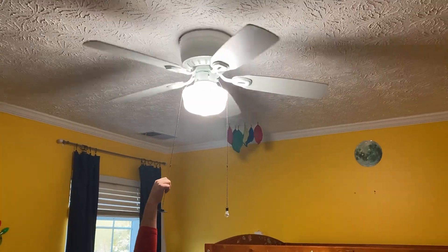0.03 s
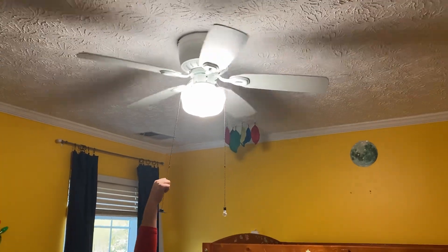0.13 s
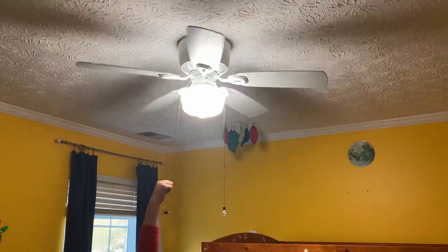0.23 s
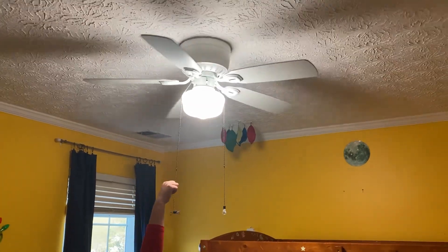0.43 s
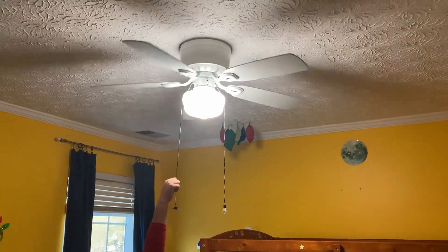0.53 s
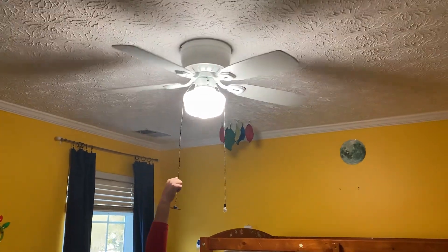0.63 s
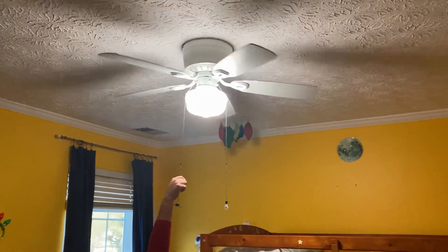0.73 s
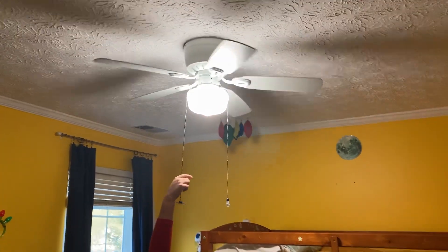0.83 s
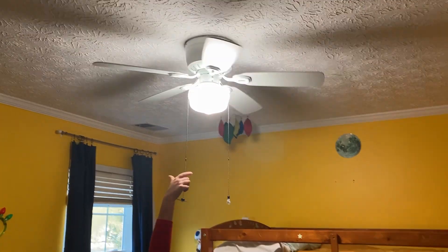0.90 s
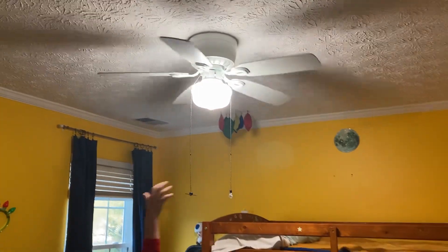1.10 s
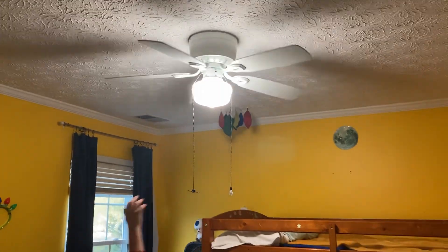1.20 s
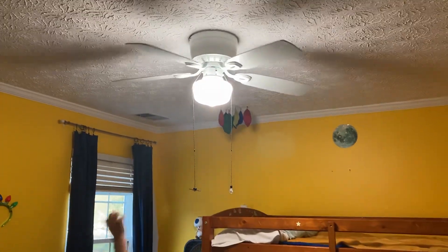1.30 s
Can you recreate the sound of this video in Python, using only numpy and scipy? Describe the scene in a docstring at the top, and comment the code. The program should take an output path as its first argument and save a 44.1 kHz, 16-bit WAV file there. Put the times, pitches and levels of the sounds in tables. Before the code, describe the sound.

A ceiling fan's pull-chain switch snaps with a brief bead rasp and low thud, then clacks back. A faint sleeve swish follows. The motor hums quietly in a small bedroom, with soft bumps on the hand-held microphone.

```python
"""The pull-chain switch of a running ceiling fan, worked by hand in a small bedroom.
Beads rasp through the eyelet and the switch snaps over: its impacts excite the modes of case, pawl and
housing, and the change of load makes the fan shudder on its mount. Let go, the switch clacks back and
the arm drops with a swish of sleeve friction. The motor hums faintly throughout, over a low rumble,
a faint breathy hiss near 2 kHz that swells and fades, and soft bumps of the hand-held microphone."""
import sys
import numpy as np
from scipy import signal
from scipy.fft import rfft, irfft
from scipy.io import wavfile

SR = 44100
rng = np.random.default_rng(int(sys.argv[2]) if len(sys.argv) > 2 else 0)


def store_pcm(level_fs):
    """Save levels as 16-bit WAV."""
    pcm = np.round(np.clip(level_fs, -1, 1) * 32767).astype(np.int16)
    wavfile.write(sys.argv[1], SR, np.atleast_2d(pcm).T)


N = 59535
T, FREQS = np.arange(N) / SR, np.fft.rfftfreq(N, 1 / SR)

# impacts inside the switch: t/s, case knock/dB, pawl tick/dB, housing ring/dB
CONTACTS = [(0.1032, -38, -42, -15.5), (.192, -43, -53.5, -28), (0.228, -18.5, -22, -3),
            (0.2474, -22, -43, -14), (0.2703, -13.5, -1, 2), (0.432, -38.5, -39, -46.5),
            (0.5002, -26.5, -30.5, -27), (0.5207, -16.5, -25, -27), (0.5234, -1, -2.5, -14.5)]
# left-right likeness of the stereo sound, in opposite phase near 9 kHz: f/Hz, likeness (clipped in use)
LIKENESS = [(60, .96), (130, 0.87), (290, 0.8), (640, 0.57), (1400, 0.046), (2400, 0.15), (4000, -0.063),
            (7500, 0.4), (9200, -1.5), (11300, 0.65), (15000, -0.6)]


def from_db(db):
    """Amplitude ratio: a factor of ten per 20 dB."""
    return 10 ** (np.asarray(db) / 20)


def at_hz(points, hz):
    """Interpolation on a logarithmic frequency axis."""
    f, value = np.transpose(points)
    return np.interp(np.log(hz + 1e-9), np.log(f), value)


def decay(t, t60):
    """Exponential damping: 60 dB in t60 seconds."""
    return np.exp(-np.log(1000) * t / t60)


def impulses(times, db):
    """Brief impacts idealised as single impulses."""
    train = np.zeros(N) + 1e-18
    np.add.at(train, (np.asarray(times) * SR).astype(int), from_db(db))
    return train


def convolve(x, response):
    """A linear system convolves its input with its impulse response."""
    return signal.fftconvolve(np.atleast_2d(x), np.atleast_2d(response), axes=1)[:, :N]


def delayed(x, seconds):
    """A circular delay: phase shift proportional to frequency."""
    return irfft(rfft(x) * np.exp(-2j * np.pi * FREQS * seconds), N)


def resonate(x, resonances):
    """Forced response of parallel two-pole resonators of alternating sign."""
    out = 0
    for k, (hz, width, db) in enumerate(resonances):
        radius = np.exp(-np.pi * width / SR)
        feedback = [1, -2 * radius * np.cos(2 * np.pi * hz / SR), radius ** 2]
        gain = (-1) ** k * from_db(db) * (1 - radius ** 2) / 2
        out += gain * signal.lfilter([1, 0, -1], feedback, x)
    return out


def ring(strikes, modes, longest_t60=.34):
    """Modal superposition: damped sines, out of step left and right where likeness is low."""
    response = 0
    for k, (hz, db, t60) in enumerate(modes):
        skew = np.arccos(np.clip(at_hz(LIKENESS, hz), -1, 1)) / 2 * np.array([[1], [-1]])
        envelope = from_db(db) * decay(T, min(t60, longest_t60))
        response += (-1) ** k * envelope * np.sin(2 * np.pi * hz * T + skew)
    return convolve(strikes, response)


def unit_rms(x):
    """Normalisation to unit mean power."""
    return x / np.sqrt(np.mean(x ** 2) + 1e-20)


def stereo_noise(spectrum):
    """Mid-side mixing: coloured noise, partly alike left and right, rms 1."""
    mid, side = rfft(rng.standard_normal((2, N)))
    alike = np.clip(at_hz(LIKENESS, FREQS), -.99, .99)
    pair = np.sqrt(1 + alike) * mid + np.sqrt(1 - alike) * side * np.array([[1], [-1]])
    return unit_rms(irfft(pair * from_db(at_hz(spectrum, FREQS)), N))


def fan_and_background(hum_hz=120, hum_db=-67, rumble_db=-65.5):
    """A pure tone over noise: motor hum, room rumble and a faint breathy hiss that swells and fades."""
    # spectra of the hiss (strongest near 2 kHz) and the rumble: f/Hz, relative density/dB
    hiss_spectrum = [(150, -18.5), (300, -3.5), (450, -4), (700, -10), (1200, -4.5), (1450, -2.5),
                     (1700, 4), (1880, -1.5), (2120, 5), (2500, -17), (3000, -30.5), (3700, -19.5),
                     (4300, -14), (5400, -34), (16000, -46.5)]
    rumble_spectrum = [(20, -12.5), (50, -7), (80, 1), (135, -10), (220, -14.5), (450, -18), (700, -21),
                       (1300, -31.5), (2100, -31.5), (3000, -40), (6000, -44), (12000, -43.5),
                       (16000, -56.5)]
    # envelope of the breathy hiss: t/s, level/dB
    hiss_level = [(0, -61.5), (.08, -74.5), (.2, -60.5), (.45, -68), (.72, -63), (.85, -64), (.96, -67.5),
                  (1.12, -65.5), (1.21, -73.5), (1.35, -91)]
    hiss = from_db(np.interp(T, *np.transpose(hiss_level))) * stereo_noise(hiss_spectrum)
    hum = from_db(hum_db) * np.sqrt(2) * np.sin(2 * np.pi * hum_hz * T)
    return hum + hiss + from_db(rumble_db) * stereo_noise(rumble_spectrum)


def handling(hz=53, rise_s=.0077):
    """Heavily damped oscillation: each bump of the microphone is two or three slow swings."""
    # soft low bumps: t/s, level/dB
    bumps = [(0.089, -56), (.575, -80), (0.791, -59.5), (1.035, -53), (1.095, -55), (1.274, -55),
             (1.326, -56.5)]
    swing = np.sin(2 * np.pi * hz * T) * T / rise_s * np.exp(1 - T / rise_s)
    return convolve(impulses(*np.transpose(bumps)), swing)


def chain(beads_per_s=700, spread_db=1):
    """A jittered impulse train: beads tick unevenly over the rim of the eyelet."""
    # slides of the chain: t/s, duration/s, energy level/dB
    slides = [(0.098, .028, -28), (0.186, .03, -36), (0.225, .026, -10.5), (.273, .016, -16.5),
              (0.433, 0.015, -37), (0.506, 0.017, -17)]
    out = 0
    for start, length, db in slides:
        count = max(int(length * beads_per_s), 1)
        times = start + length * (np.arange(count) + rng.random(200)[:count]) / count
        beads = impulses(times, -spread_db * rng.standard_normal(N)[:count])
        out += from_db(db) * beads / np.sqrt(np.sum(beads ** 2))
    return out


def eyelet(beads):
    """Forced resonance: the eyelet colours the scrape of the beads."""
    # eyelet resonances: f/Hz, bandwidth/Hz, gain/dB
    resonances = [(1453, 45, 14), (2064, 50, 10.5), (2620, 450, 5.5), (3550, 460, -4.5), (6700, 700, -9.5),
                  (11900, 1600, -25)]
    return resonate(beads, resonances)


def switch_case(beads, bead_db=-9, gain_db=4, low_cut_hz=640):
    """Impact excitation: contacts and beads knock the well-damped case."""
    # case resonances: f/Hz, bandwidth/Hz, relative gain/dB
    resonances = [(924, 29, -2), (1214, 250, 3.5), (1570, 280, 0.5), (1946, 148, 15.5), (2130, 339, 10),
                  (2640, 410, 1.5), (3413, 180, -6.5), (4480, 520, -4.5)]
    times, case_db, _, _ = np.transpose(CONTACTS)
    knock = resonate(impulses(times, case_db) + from_db(bead_db) * beads, resonances)
    low_cut = signal.butter(2, low_cut_hz, "high", fs=SR, output="sos")
    return from_db(gain_db) * signal.sosfilt(low_cut, knock)


def housing(beads, bead_db=-7.5, gain_db=-49):
    """Free vibration: the fan housing rings on after each bead and contact."""
    # modes of housing and lamp glass: f/Hz, relative level/dB, T60/s (capped by ring)
    modes = [(165, -11.5, .3), (386, -5, 0.2), (459, 4, .19), (585, -10.5, 0.32), (787, -3, 0.28),
             (1120, 0, 0.26), (1465, -4.5, 0.35), (1780, -4.5, .22), (1937, -4, .26), (2085, -6.5, .22),
             (2140, -6, .22), (2470, -3, .22), (2740, -4, 0.14), (3335, -11.5, 0.13), (4400, -14.5, .22)]
    times, _, _, ring_db = np.transpose(CONTACTS)
    return from_db(gain_db) * ring(impulses(times, ring_db) + from_db(bead_db) * beads, modes)


def pawl(chatter_s=.003, click_share=.37, chatter_share=.87, gain_db=-1):
    """Contact chatter: the steel pawl ticks and buzzes briefly at each impact."""
    # resonances of pawl and spring: f/Hz, bandwidth/Hz, relative gain/dB
    resonances = [(3560, 2700, -10), (5110, 1200, -7.5), (5850, 1500, -5.5), (7780, 1400, 1.5),
                  (8900, 760, 0), (9620, 810, -2), (11330, 1310, 0.5), (15530, 2000, -12.5)]
    times, _, pawl_db, _ = np.transpose(CONTACTS)
    tick = resonate(impulses(times, pawl_db), resonances)
    buzz = rng.standard_normal(N) * np.exp(-T / chatter_s)
    chatter = convolve(tick, buzz / np.sqrt(np.sum(buzz ** 2)))[0]
    return from_db(gain_db) * (click_share * tick + chatter_share * chatter)


def switch_cover(t60=.26):
    """Free vibration: the light modes of the cover decay at one rate after each contact."""
    # cover modes: f/Hz in one list, level/dB in the other
    mode_hz = [792, 949, 1116, 1229, 1826, 1888, 1946, 2100, 2193, 2257, 2488, 2686, 2987, 4512]
    mode_db = [-43.5, -41, -54.5, -47.5, -54, -33, -43.5, -52, -43, -45.5, -45, -45, -49.5, -51]
    times, case_db, _, _ = np.transpose(CONTACTS)
    return ring(impulses(times, case_db), [(hz, db, t60) for hz, db in zip(mode_hz, mode_db)])


def bedroom(build_s=.001, gain_db=3):
    """Reverberation: an impulse response that builds quickly and dies sooner in the treble."""
    # spectrum of the reflections: f/Hz, relative level/dB
    colour = [(100, -1), (1000, 8), (2000, -1), (3200, 4.5), (4500, 7.5), (7500, -3), (9200, 1.5),
              (11500, -3.5), (15000, -2)]
    # reverberation times: f/Hz, T60/s
    band_t60 = [(100, 0.98), (500, 0.39), (1000, 0.26), (2000, 0.26), (4000, 0.24), (8000, 0.23),
                (14000, 0.22)]
    field = rfft(stereo_noise(colour))
    tail = 0
    for centre, t60 in band_t60:
        band = at_hz([(f, f == centre) for f, _ in band_t60], FREQS)
        tail += irfft(field * band, N) * decay(T, t60)
    tail *= 1 - np.exp(-T / build_s)
    return from_db(gain_db) * tail / np.sqrt(np.sum(tail ** 2) / 2)


def mount_thud(jolts, gain_db=50.5):
    """Impulse response of low, damped resonances: a dull knock of the mounting."""
    # mount resonances: f/Hz, bandwidth/Hz, relative gain/dB
    resonances = [(50, 46, -5.5), (141.2, 18, -3.5), (260, 180, -16)]
    return from_db(gain_db) * resonate(jolts, resonances)


def shudder(jolts, hz=77, rise_s=.029, hold_s=.082, t60=.24, gain_db=-1):
    """Transient oscillation of the fan on its mount: a low boom that swells, holds and dies."""
    envelope = (1 - np.exp(-T / rise_s)) * decay(np.maximum(T - hold_s, 0), t60)
    return from_db(gain_db) * convolve(jolts, np.sin(2 * np.pi * hz * T) * envelope)


def sleeve(treble_hz=3430, rub_width_hz=96, rub_db=12.5):
    """Friction noise: as the hand lets go and drops, each rub swells and fades at its own pitch."""
    # swishes: peak t/s, Gaussian width/s, level/dB, treble gain/dB, rub f/Hz
    swishes = [(.915, 0.054, -68, -26, 1230), (1.001, 0.025, -68, -0.5, 4180),
               (1.063, 0.036, -67.5, 3, 397), (1.147, .05, -73.5, -7, 2600)]
    # spectrum of rubbing cloth: f/Hz, relative density/dB
    spectrum = [(200, -14.5), (430, 6), (700, -5.5), (1000, 1), (1300, -3.5), (2000, -4.5), (2650, -2.5),
                (3050, -24), (3600, -5), (4200, -11), (5000, -11.5), (6200, -17.5), (7500, -30.5),
                (15000, -41)]
    cloth = stereo_noise(spectrum)
    treble = irfft(rfft(cloth) * FREQS ** 8 / (FREQS ** 8 + treble_hz ** 8), N)
    out = 0
    for peak_s, width_s, db, treble_db, hz in swishes:
        rub = cloth + (from_db(treble_db) - 1) * treble + resonate(cloth, [(hz, rub_width_hz, rub_db)])
        swell = np.exp(-.5 * ((T - peak_s) / width_s) ** 2)
        out += from_db(db) * swell * unit_rms(rub)
    return out


def scene(direct_db=1, left_lead_s=74e-6, echo_s=.0112, echo_db=-12.5, ringing_send=.058):
    """Superposition of direct sound, an echo from the nearest wall and reverberation."""
    # the change of load jolts the whole fan: t/s, level/dB
    load_changes = [(.243, -43.5), (.528, -52)]
    jolts = impulses(*np.transpose(load_changes))
    room, background, beads = bedroom(), fan_and_background(), chain()
    snap = eyelet(beads) + switch_case(beads) + pawl()
    ringing = housing(beads) + switch_cover()
    direct = from_db(direct_db) * np.array([delayed(snap, -left_lead_s), snap])
    echo = from_db(echo_db) * delayed(direct, echo_s)
    reverberation = convolve(snap + mount_thud(jolts) + ringing_send * ringing, room)
    return background + handling() + direct + ringing + echo + reverberation + shudder(jolts) + sleeve()


def record(dry):
    """Band limiting: an elliptic low-pass cuts steeply above 16.2 kHz."""
    return signal.sosfilt(signal.ellip(10, .2, 80, 16200, fs=SR, output="sos"), dry)


dry = scene()
out = record(dry)
store_pcm(out)
```